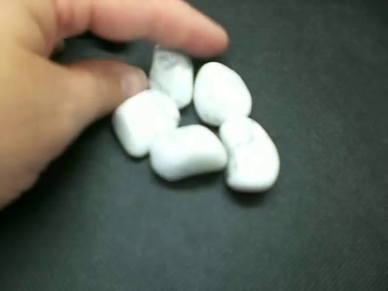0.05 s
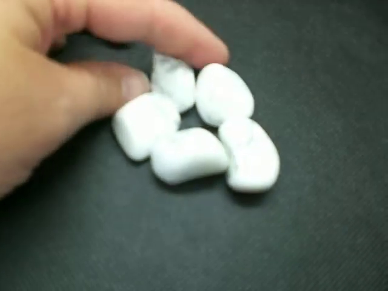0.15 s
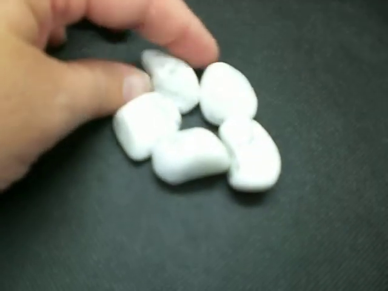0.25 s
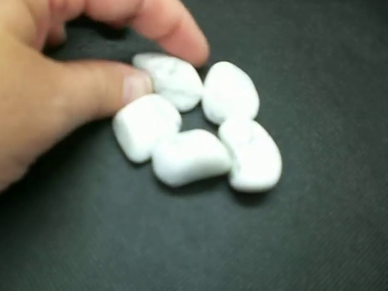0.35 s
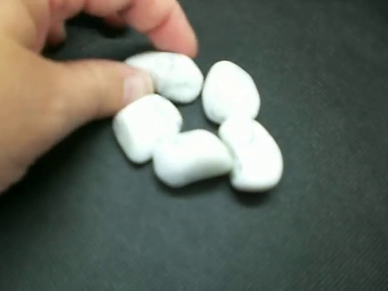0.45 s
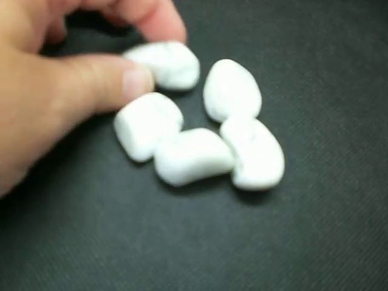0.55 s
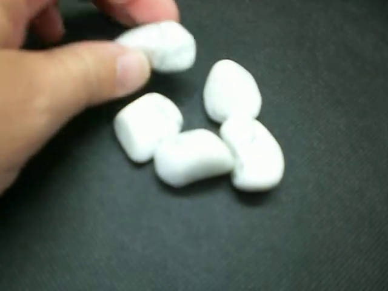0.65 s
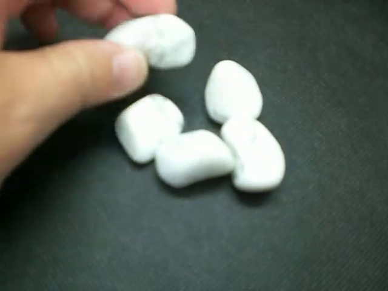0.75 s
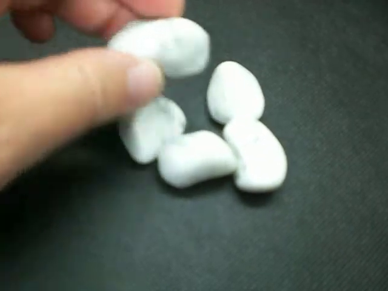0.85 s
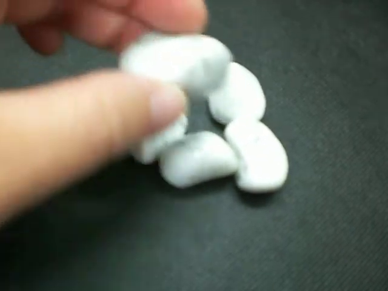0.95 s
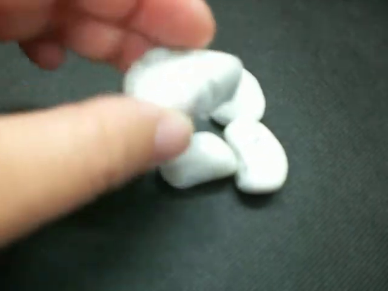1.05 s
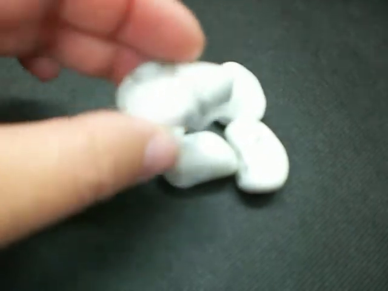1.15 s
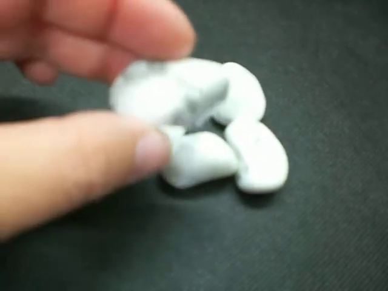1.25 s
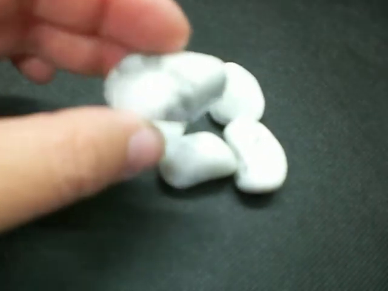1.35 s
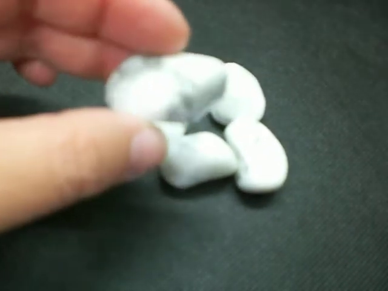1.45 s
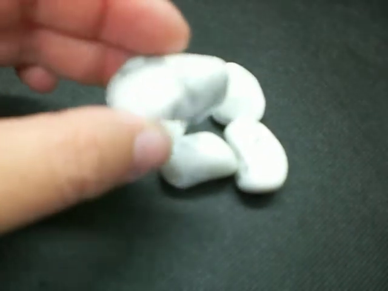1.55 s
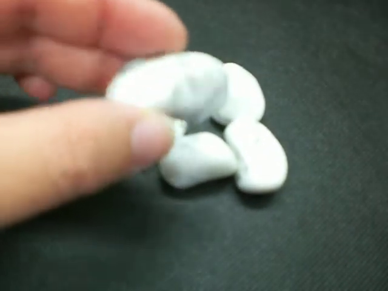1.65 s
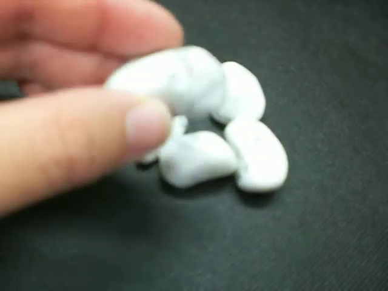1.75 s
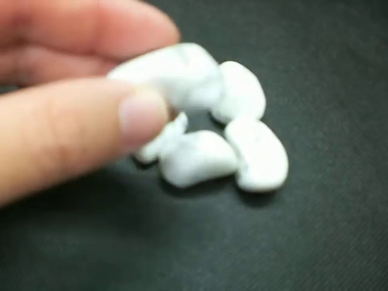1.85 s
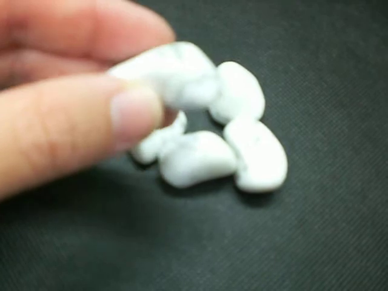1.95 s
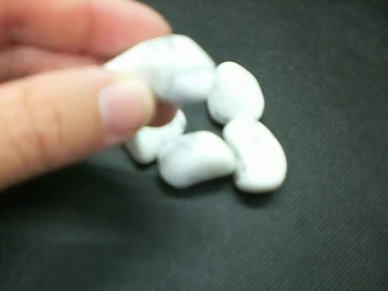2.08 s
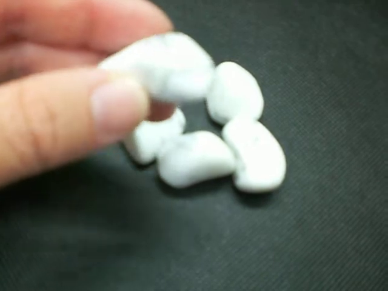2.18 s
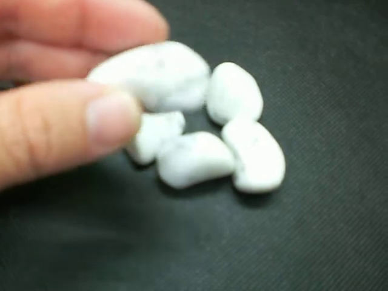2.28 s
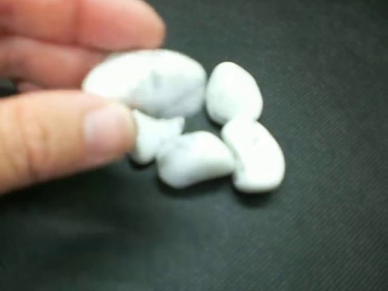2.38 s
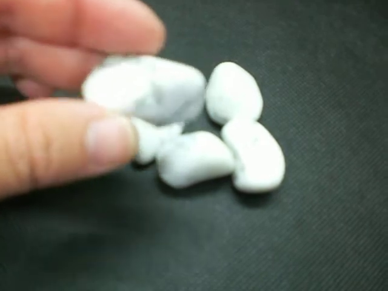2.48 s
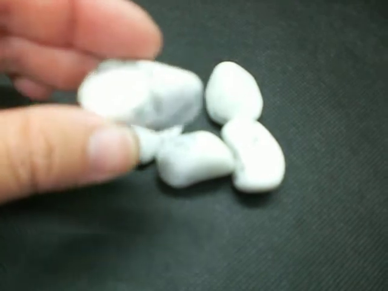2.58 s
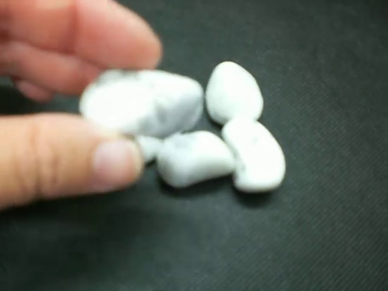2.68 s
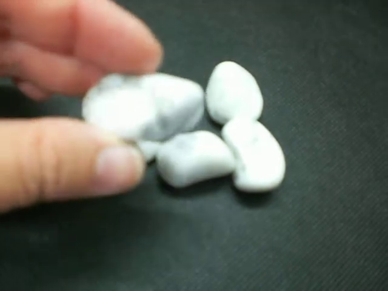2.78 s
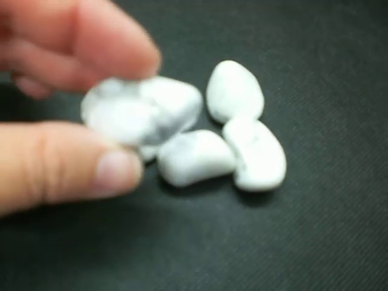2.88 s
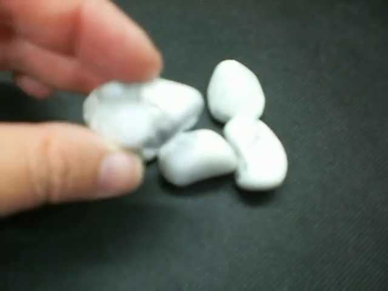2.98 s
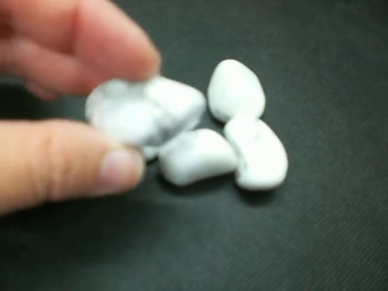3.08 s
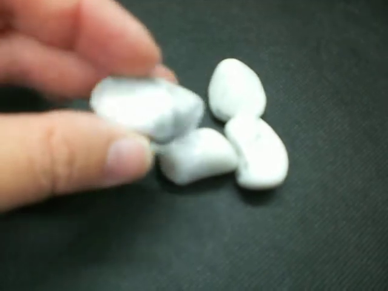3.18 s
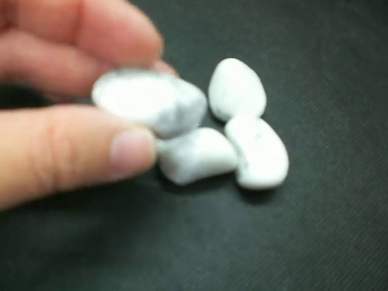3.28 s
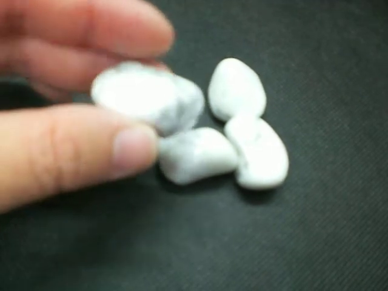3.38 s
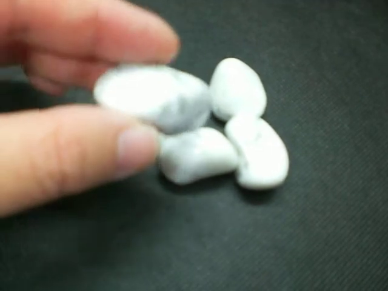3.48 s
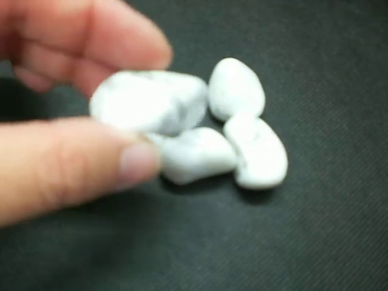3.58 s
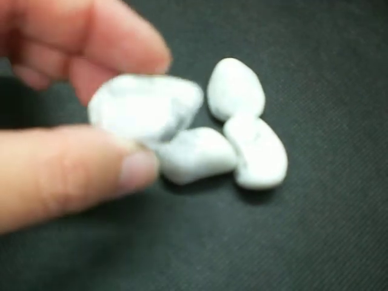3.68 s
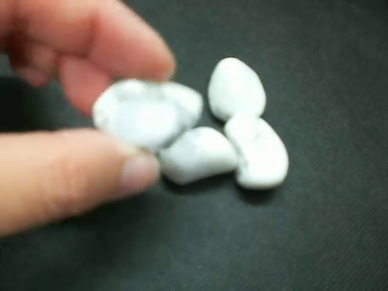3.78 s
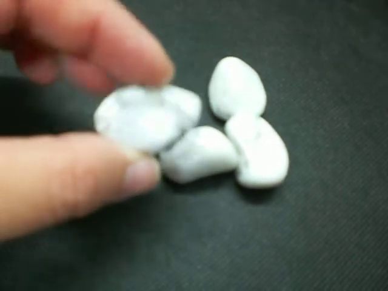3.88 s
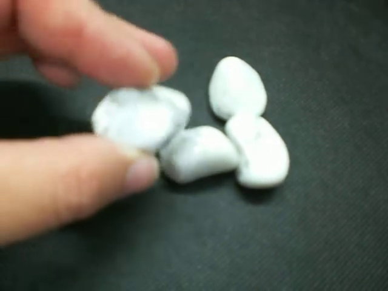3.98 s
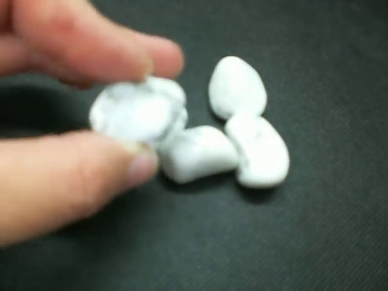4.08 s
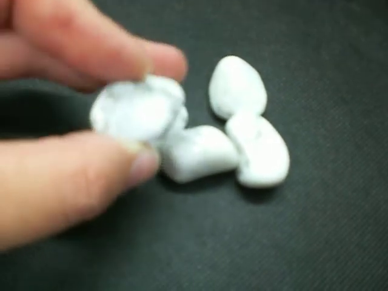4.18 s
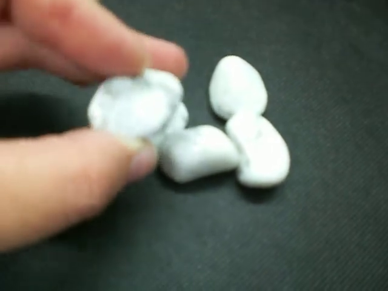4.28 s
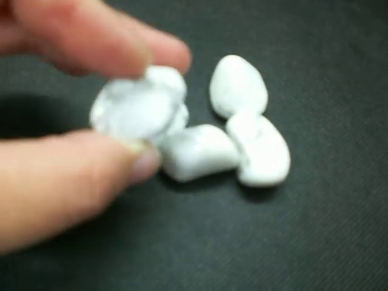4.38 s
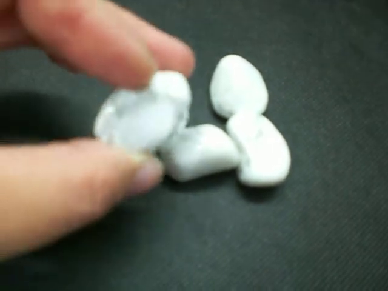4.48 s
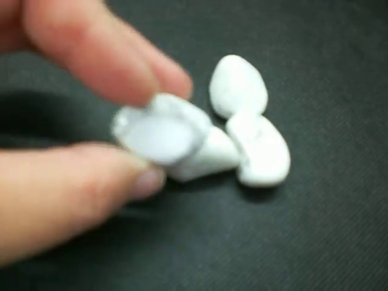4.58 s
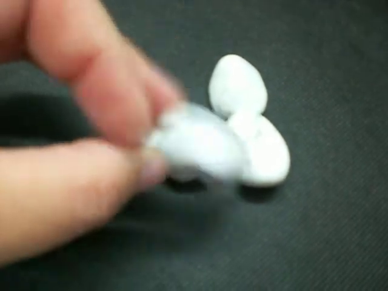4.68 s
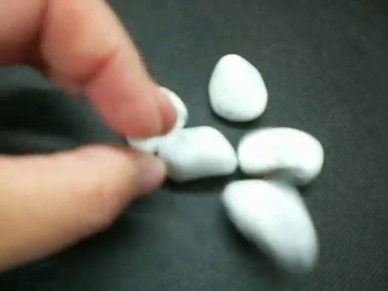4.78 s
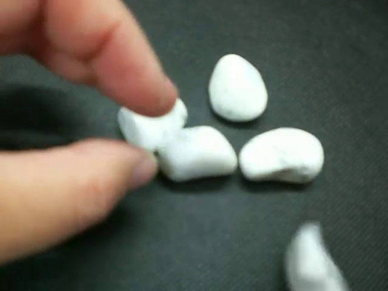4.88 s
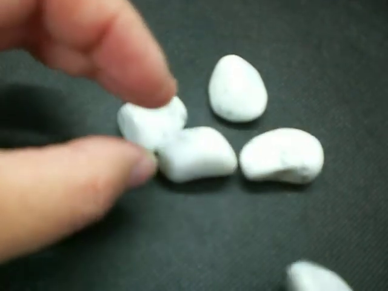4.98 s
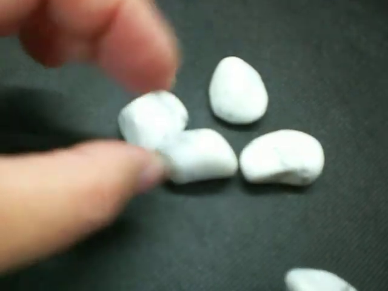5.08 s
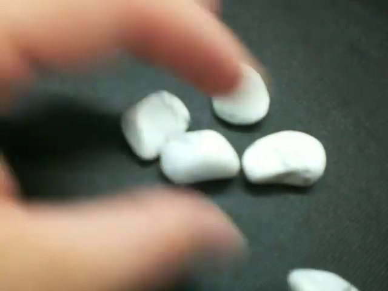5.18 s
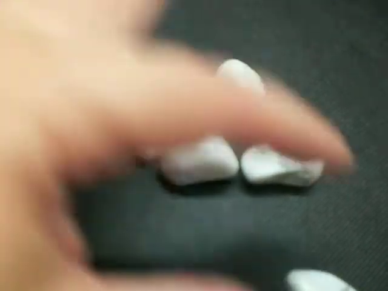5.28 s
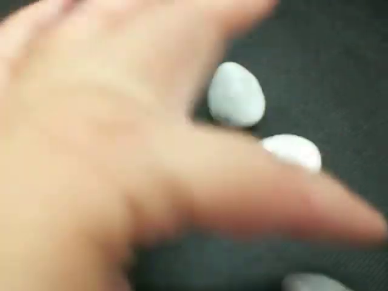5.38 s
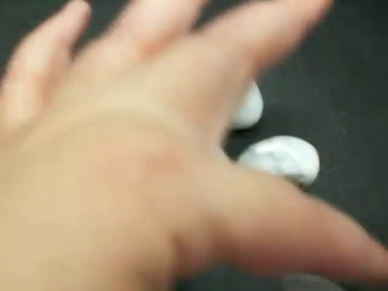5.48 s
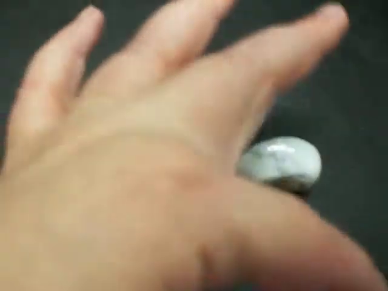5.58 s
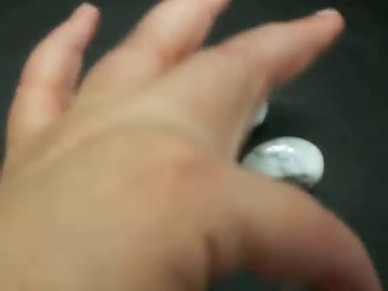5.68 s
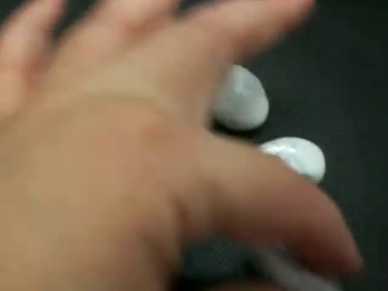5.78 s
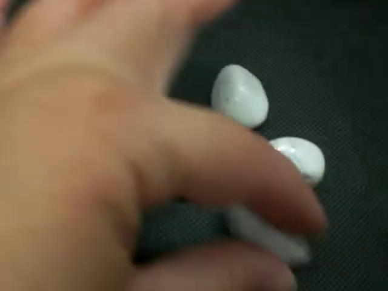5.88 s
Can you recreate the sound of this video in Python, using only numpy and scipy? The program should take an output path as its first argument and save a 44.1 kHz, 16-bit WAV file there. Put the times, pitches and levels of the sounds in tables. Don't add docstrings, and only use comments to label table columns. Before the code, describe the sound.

A steady soft microphone hiss lies under everything, in a small furnished room with little echo. At the start fingers brush cloth, and small polished stones click lightly between 0.1 and 0.2 seconds, the clearest tick at 0.16. A sleeve rub swells to about 0.8 and stops near 1.0. The middle is quiet: faint stone grazes around 3.0 and 4.0, and distant birds giving harsh falling chirps at 0.4, 2.1, 2.7 and 4.0, plus thin whistles. A dove coos very faintly from 4.3 to 5.5. At 4.72 a stone drops with a very loud, bright, hard clack, bounces strongly at 4.76 and rattles out by 4.9, each blow making the table top boom like a short dull drum. From 5.5 cloth rubbing rises, peaking near 5.75, with a crisp stone snap at 5.76 and two tiny skin squeaks around 5.8, then fading to hiss.

```python
import sys
import numpy as np
from scipy import signal
from scipy.io import wavfile
from scipy.ndimage import uniform_filter1d

SR = 44100
rng = np.random.default_rng(int(sys.argv[2]) if len(sys.argv) > 2 else 0)


def magnitude_from_level(level_db):
    exponent = np.asarray(level_db, float) / 20
    return 10 ** exponent


def put_to_file(sound):
    columns = np.atleast_2d(sound).T
    safe = np.clip(columns, -1, 1)
    whole_steps = np.round(safe * 32767)
    wavfile.write(sys.argv[1], SR, whole_steps.astype(np.int16))


N = 261954


def evened(x):
    return x / np.sqrt(np.mean(x ** 2) + 1e-20)


def drift(size, smooth):
    return evened(uniform_filter1d(rng.standard_normal(size), smooth))


def add(mix, s, sound):
    part = mix[round(s * SR):][:len(sound)]
    part += sound[:len(part)]


def resonate(x, hz, width):
    turn = np.exp(2j * np.pi * hz * np.arange(len(x)) / SR)
    r = np.exp(-np.pi * width / SR)
    return 2 * (turn * signal.lfilter([1 - r], [1, -r], x / turn)).real


def hiss():
    # pitch in Hz, level in dB per Hz.
    noise_colour = [(12, -20), (20, -4), (38, -14), (70, -5.5), (106, -5), (137, -3.5), (252, -2),
                    (441, -5), (885, -8.5), (1050, -10.5), (2350, -14.5), (3370, -16.5), (4580, -17.5),
                    (7560, -20.5), (15600, -21.5)]
    # pitch in Hz, width in Hz, level in dB.
    mic_bumps = [(7290, 160, -3), (7720, 190, -6), (14500, 210, 3.5)]
    frames, hz = N // 512 + 5, np.fft.rfftfreq(2048, 1 / SR)
    real, imaginary = rng.standard_normal((frames, 1025, 2)).T
    colour_hz, db = np.transpose(noise_colour)
    colour_db = np.interp(np.log(hz + 1), np.log(colour_hz + 1), db)
    colour_db += sum(d * np.exp(-((hz - c) / w) ** 2) for c, w, d in mic_bumps)
    swell_db = .25 * drift(frames, 12)
    spectrum = (real + 1j * imaginary) * magnitude_from_level(colour_db[:, None] + swell_db)
    noise = signal.istft(spectrum, nperseg=2048, noverlap=1536)[1][:N]
    return magnitude_from_level(-57.5) * evened(noise)


def chirp(length, hz0, hz1, db, warble):
    t = np.arange(0, length, 1 / SR)
    hz = hz0 * (hz1 / hz0) ** ((t / length) ** .6)
    level = np.minimum(t / .004, 1) * magnitude_from_level(db - 10 * (t / length) ** 2)
    wobble = drift(12000, 150)[:len(t)]
    flutter = 1 + warble * np.sin(2 * np.pi * 60 * t) + 0.034 * wobble
    steps = .7 + .4 * np.cos(2 * np.pi * 28 * t + .6 * wobble)
    turns = 2 * np.pi * np.cumsum(hz * flutter) / SR
    voices = np.sin(turns) + 0.22 * np.sin(0.84 * turns)
    return level * magnitude_from_level(1.32 * wobble) * steps * voices


def birds():
    # start in seconds, length in seconds, start Hz, end Hz, level in dB.
    single_chirps = [
        (.392, .075, 4300, 3100, -51),
        (2.070, .085, 4650, 2950, -54),
        (2.918, .03, 2630, 2520, -56),
        (4.028, .16, 4550, 2600, -56),
        (4.68, .1, 4600, 3000, -54),
        (5.88, .06, 4300, 4200, -59),
    ]
    # start in seconds, level in dB.
    triple_calls = [
        (1.055, -63),
        (2.735, -54),
        (5.222, -55),
    ]
    # delay in seconds, length in seconds, start Hz, end Hz, level in dB.
    call_parts = [
        (0, .065, 5500, 4100, 0),
        (.072, .055, 4800, 4000, 2.5),
        (.145, .065, 4500, 4200, -3),
    ]
    # start in seconds, length in seconds, start Hz, end Hz, level in dB.
    pure_notes = [
        (1.50, 0.11, 2300, 2300, -72),
        (2.31, 0.08, 1960, 1940, -76),
        (2.60, 0.13, 2380, 2350, -66),
        (3.09, 0.14, 2295, 2250, -65.5),
        (4.31, 0.073, 514, 556, -62),
        (4.385, 0.096, 557, 560, -55.5),
        (4.57, 0.2, 535, 560, -62.5),
        (4.99, 0.071, 583, 533, -61.5),
        (5.28, 0.071, 521, 510, -59.5),
        (5.43, .1, 519, 507, -61),
    ]
    out = np.zeros(N)
    for s, length, hz0, hz1, db in single_chirps:
        add(out, s, chirp(length, hz0, hz1, db, .06))
    for s, db in triple_calls:
        for delay, length, hz0, hz1, part_db in call_parts:
            add(out, s + delay, chirp(length, hz0, hz1, db + part_db, .11))
    t = np.arange(6000) / SR
    yard = rng.standard_normal(6000) * magnitude_from_level(-60 * t / 0.18)
    out = 0.3 * out + signal.oaconvolve(out, yard / np.linalg.norm(yard))[:N]
    waver = drift(N, 600)
    for s, length, hz0, hz1, db in pure_notes:
        size = int(length * SR)
        tone = np.sin(2 * np.pi * np.cumsum(np.linspace(hz0, hz1, size)) / SR)
        shape = np.hanning(size) ** .5
        add(out, s, magnitude_from_level(db) * tone * shape * magnitude_from_level(3 * waver[round(s * SR):][:size]))
    return out


def patchy(x, patchy_db):
    z = signal.stft(x, nperseg=512)[2]
    patches = uniform_filter1d(rng.standard_normal(z.shape), 9, 0)
    patches = evened(uniform_filter1d(patches, 6, 1))
    return evened(signal.istft(z * magnitude_from_level(patchy_db * patches), nperseg=512)[1][:N])


def rub():
    # pitch in Hz, width in Hz, level in dB.
    bright_cloth = [(4700, 3800, -2), (6500, 1300, -12), (11100, 18000, -6.5)]
    # pitch in Hz, width in Hz.
    dull_cloth = (2520, 4100)
    # time of most pressure in seconds, level in dB, seconds to rise by 20 dB,
    # seconds to fall by 20 dB, level of the dull share in dB.
    strokes = [(0, -57.5, .05, .12, -1), (.18, -67, .9, .3, 3), (.42, -70, .15, .14, 13),
               (.60, -67.5, .2, .06, 11), (.66, -64, .15, .5, -9), (.785, -53.5, .22, .65, -17),
               (1.1, -73, .2, .4, -6), (5.49, -67, .25, .4, -4), (5.665, -56, .18, .2, -17),
               (5.745, -51.5, .26, .07, -14), (5.80, -63, .1, .9, 2.5), (5.94, -63, .2, .1, 2)]
    sleeve_off_s = 1.015
    t = np.arange(N) / SR
    slips = rng.standard_normal(N) * magnitude_from_level(0.99 * drift(N, 60))
    slips = patchy(slips, patchy_db=1.5)
    bright = evened(sum(magnitude_from_level(db) * resonate(resonate(slips, hz, w), hz, w) for hz, w, db in bright_cloth))
    dull = evened(resonate(resonate(slips, *dull_cloth), *dull_cloth))
    power = np.zeros((2, N))
    for s, db, rise, fall, dull_db in strokes:
        level = magnitude_from_level(db - 20 * np.where(t < s, (s - t) / rise, (t - s) / fall))
        if s < sleeve_off_s:
            level = level * magnitude_from_level(-np.clip((t - sleeve_off_s) * 200, 0, 40))
        power += (level * magnitude_from_level([[0], [dull_db]])) ** 2
    return np.sqrt(power[0]) * bright + np.sqrt(power[1]) * dull


def squeaks():
    # start in seconds, length in seconds, slips per second, level in dB.
    squeak_bursts = [
        (5.784, 0.0128, 1505, -54),
        (5.806, 0.014, 1505, -49),
    ]
    overtones_db = [-2, 1.5, 4.5, -12, -14, -14]
    # pitch in Hz, width in Hz, level in dB.
    hand_hollow = (1090, 83, -4)
    out, (body_hz, width, body_db) = np.zeros(N), hand_hollow
    for s, length, hz, db in squeak_bursts:
        size = int(length * SR)
        rate, grip = drift(2000, 60)[:size], drift(2000, 60)[:size]
        turns = np.cumsum(hz * (1 + .025 * rate)) / SR
        tone = sum(magnitude_from_level(d) * np.sin(2 * np.pi * (k + 1) * turns) for k, d in enumerate(overtones_db))
        shape = signal.windows.tukey(size, .4)
        add(out, s, magnitude_from_level(db + 3.5 * grip) * tone * shape)
        push = np.r_[grip * shape, np.zeros(900)]
        add(out, s, magnitude_from_level(db + body_db) * evened(resonate(push, body_hz, width)))
    return out


def ring(modes, sign):
    t = np.arange(13000) / SR
    return sum(sign ** k * magnitude_from_level(db - 60 * t / t60) * np.sin(2 * np.pi * hz * t)
               for k, (hz, db, t60) in enumerate(modes))


def table():
    # start in seconds, blow in dB, contact in milliseconds,
    # extra drive of the whole board in dB, extra drive across the board in dB.
    blows = [(4.7184, -18, 0.36, -11, -16), (4.7238, -34, 0.86, 12, 2), (4.735, -26, 0.43, 2, 1.5),
             (4.746, -21.5, 2, 1.5, 2.5), (4.765, -34.5, 1.3, 5, -8), (4.780, -37, 0.62, 7.5, 9),
             (4.789, -42.5, 1.4, 12.5, 0), (4.7932, -31, 1.02, 3, 6), (4.833, -28.5, 2.1, 2, -4),
             (4.902, -34, 0.88, 8.5, 10), (4.913, -34, 1.62, -5, 7.5), (5.762, -45, 0.43, -16, -1),
             (5.787, -54.5, 0.26, -1, 5), (5.808, -51, 0.22, -8, 8)]
    # pitch in Hz, level in dB, time to die by 60 dB in seconds.
    local_modes = [(343, -10.5, 0.076), (370, -3, 0.071), (459, 1, 0.029), (479, -2, 0.055),
                   (560, -9.5, 0.031), (617, -1.5, 0.044), (735, 1, 0.023), (888, -5.5, 0.1),
                   (980, -8, 0.07), (1097, -1.5, 0.023), (1253, 2.5, 0.048), (1594, -22, 0.15),
                   (1883, -7, 0.058), (2250, -4, 0.04), (2620, -2.5, .045)]
    board_modes = [(80, -27, 0.054), (118, -9.5, 0.074), (136, -12.5, 0.21), (173, -21, 0.27),
                   (200.6, -6, 0.14), (226.4, 0.5, 0.22)]
    cross_modes = [(263, -13, 0.15), (278.5, -9.5, 0.27)]
    force = np.zeros((3, N))
    for s, db, ms, *shares_db in blows:
        push = np.sin(np.pi * np.minimum(np.arange(300) / SR / (ms / 1000), 1)) ** 2
        for line, share_db in zip(force, [0, *shares_db]):
            add(line, s, magnitude_from_level(db + share_db) * push / push.sum())
    rings = [ring(local_modes, -0.98), -ring(board_modes, 0.88), -ring(cross_modes, 1)]
    motion = signal.oaconvolve(force, rings, axes=1).sum(0)[:N]
    return signal.lfilter(*signal.butter(3, 110, "high", fs=SR), motion)


def band(x, hz, *widths):
    for width in widths:
        x = resonate(x, hz, width * hz)
    return x / abs(x).max()


def contacts(rows, scatter, scatter_s):
    out, t = np.zeros(N), np.arange(4410) / SR
    chances = rng.standard_normal((len(rows), 2, 4410))
    for (s, db, hz, dull_db, dull_hz), chance in zip(rows, chances):
        t60 = scatter_s * np.exp(-.011 * (max(db, -45) + 30))
        fade = magnitude_from_level(-60 * t / t60) + 0.013 * magnitude_from_level(-60 * t / 0.087)
        echoes = scatter * chance * fade * (t > .00025)
        echoes[:, 0] = 1
        echoes[:, [17, 40]] += .5, -.4
        bright = band(echoes[0], hz, 0.5, 0.7, 1.04)
        dull = band(echoes[1], dull_hz, 0.59, 1.25, 1.57)
        add(out, s, magnitude_from_level(db) * (bright + magnitude_from_level(dull_db) * dull))
    return out


def clicks():
    # start in seconds,
    # peak in dB, bright centre in Hz, level of the dull part in dB, dull centre in Hz.
    plain_clicks = [(0.1219, -34.5, 9500, 4.5, 5500), (0.127, -39, 9000, 4.5, 5000),
                    (.551, -56, 5000, -2, 1800), (4.7192, -10, 10200, -7, 2300),
                    (4.7192, -5.5, 14000, -1.5, 6300), (4.781, -40.5, 9000, 0, 2800),
                    (4.7935, -51, 6000, 15, 2600), (4.834, -55.5, 6500, 11.5, 2700),
                    (5.7538, -27, 12600, -6, 1600), (5.7615, -26, 13000, -5, 3730),
                    (5.7625, -43, 6000, 12, 1600), (5.7855, -44, 14000, 1, 6500),
                    (5.807, -42, 13000, 5.5, 9000)]
    clean_ticks = [
        (4.7189, -3, 11500, -16, 7000),
        (.1624, -23, 12900, -1.5, 4500),
        (.1773, -37, 11000, 4, 5200),
        (4.7343, -33.5, 4000, 8.5, 2700),
        (4.7637, -11.5, 11400, -6, 6500),
        (4.9015, -37, 4200, 3.5, 2000),
    ]
    grazes = [
        (.29, -56, 5000, 4, 2800),
        (.595, -63, 6000, 4, 2510),
        (2.985, -56, 14500, 7, 5000),
        (3.0, -57, 6000, 7, 4000),
        (4.005, -56, 7200, -10, 4200),
    ]
    skids = [
        (4.765, -26, 11000, 8, 6200),
        (.1645, -36, 9000, -0.5, 5500),
    ]
    hand_snaps = [
        (0.0968, -40, 5500, 0, 3220),
        (5.7599, -17, 12500, -6, 2330),
    ]
    out = contacts(plain_clicks, .25, .033)
    out += contacts(clean_ticks, .062, .036)
    out += contacts(grazes, 1.6, .08)
    out += contacts(skids, 1.6, .029)
    out += contacts(hand_snaps, .25, .021)
    return signal.lfilter(*signal.butter(2, 1300, "high", fs=SR), out)


def room(x):
    t = np.arange(15000) / SR
    tail = rng.standard_normal(15000) * magnitude_from_level(-60 * t / 0.46) * (t > .006)
    tail = signal.lfilter(*signal.butter(1, 3000, fs=SR), tail)
    return signal.oaconvolve(x, tail / np.linalg.norm(tail))[:N]


def scene():
    stones = clicks() + table() + squeaks()
    soft = magnitude_from_level(-28) * room(stones) + rub() + birds() + hiss()
    soft_band = signal.firwin(1023, 15880, window=("kaiser", 9), fs=SR)
    soft = signal.oaconvolve(soft, soft_band, "same")
    return (stones + soft)[None]


def top_cut(x):
    return signal.sosfilt(signal.butter(12, 17010, fs=SR, output="sos"), x)


def record(dry):
    low, top = (signal.firwin(301, hz, window=("kaiser", 8), fs=SR) for hz in (15900, 16650))
    converter = low + magnitude_from_level(-14) * (top - low)
    dry = signal.oaconvolve(dry, converter[None], "same")
    return top_cut(np.clip(dry, -1, 1))


dry = scene()
out = record(dry)
put_to_file(out)
```